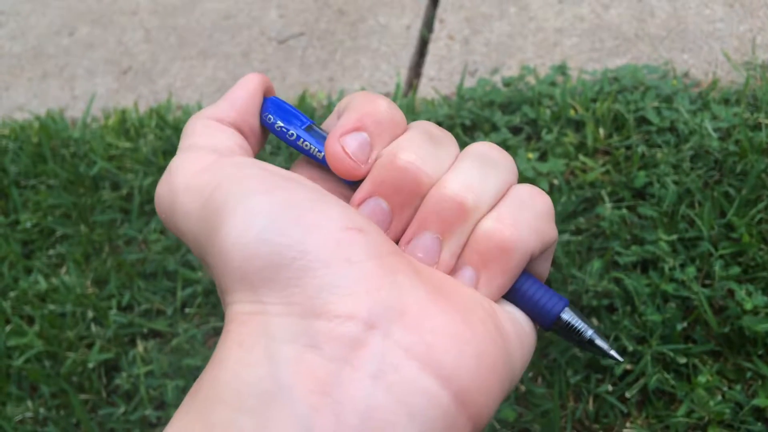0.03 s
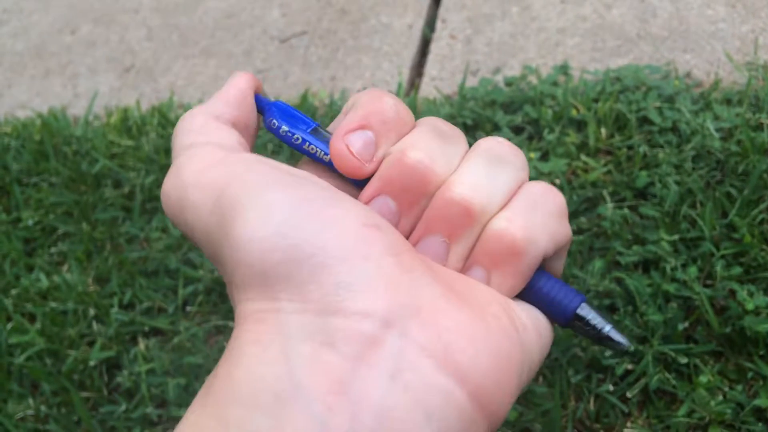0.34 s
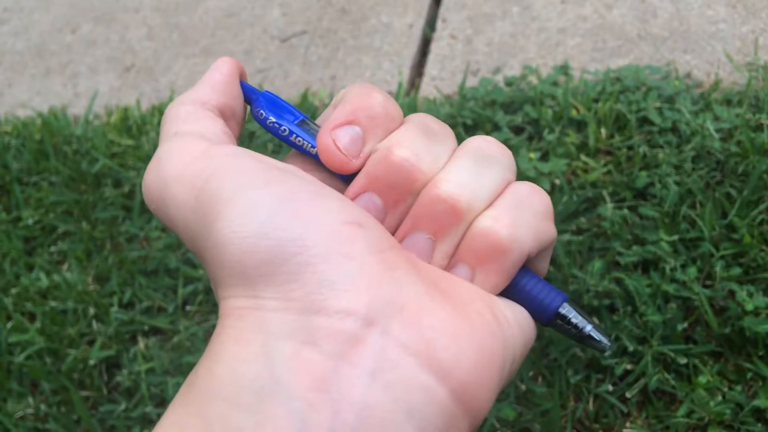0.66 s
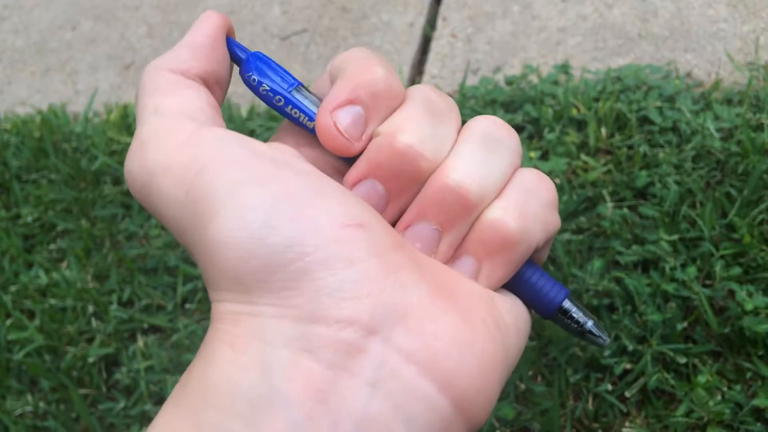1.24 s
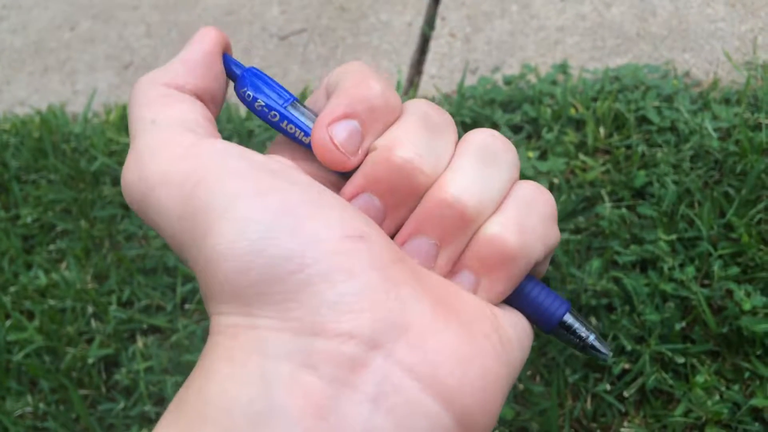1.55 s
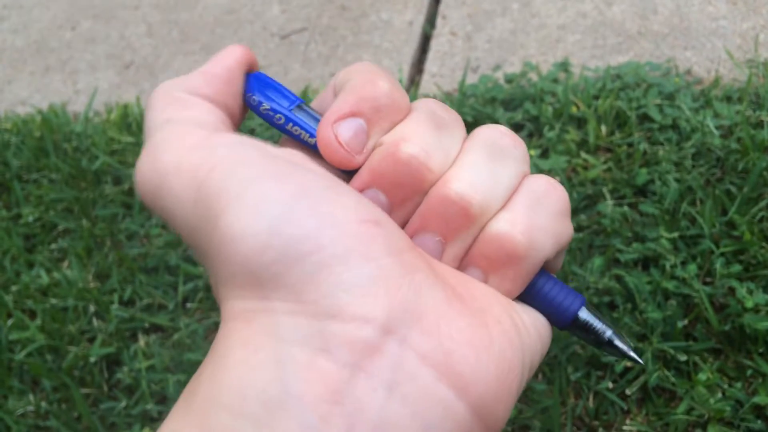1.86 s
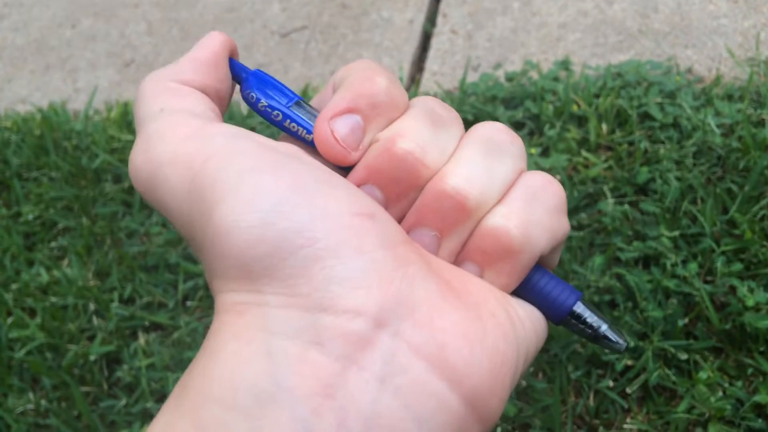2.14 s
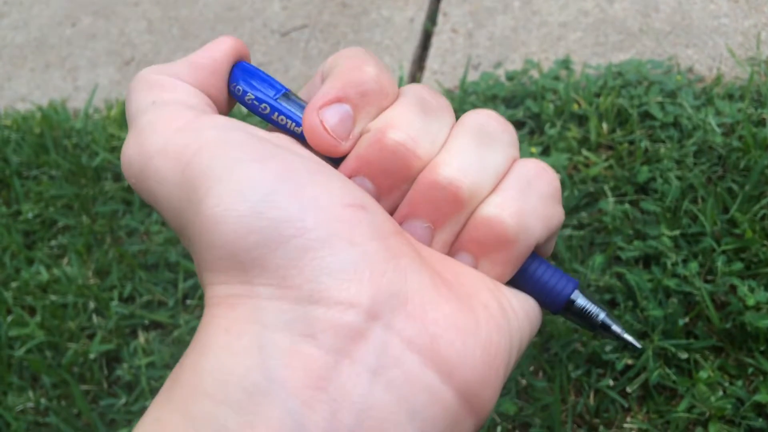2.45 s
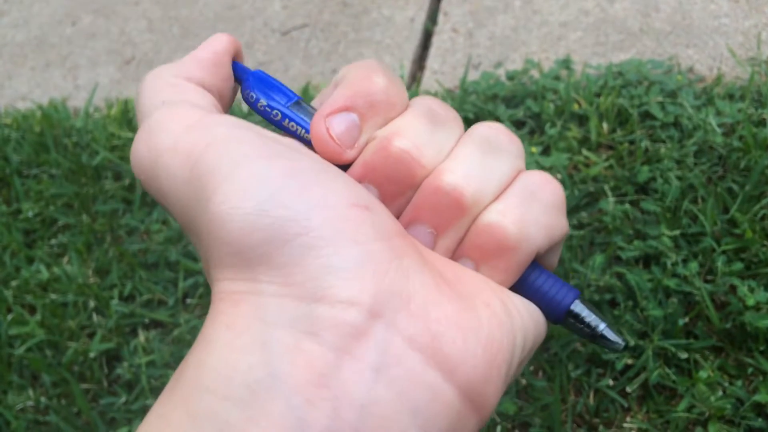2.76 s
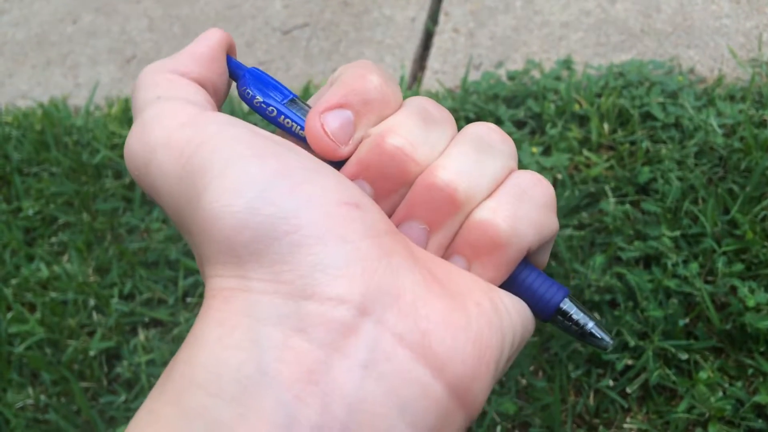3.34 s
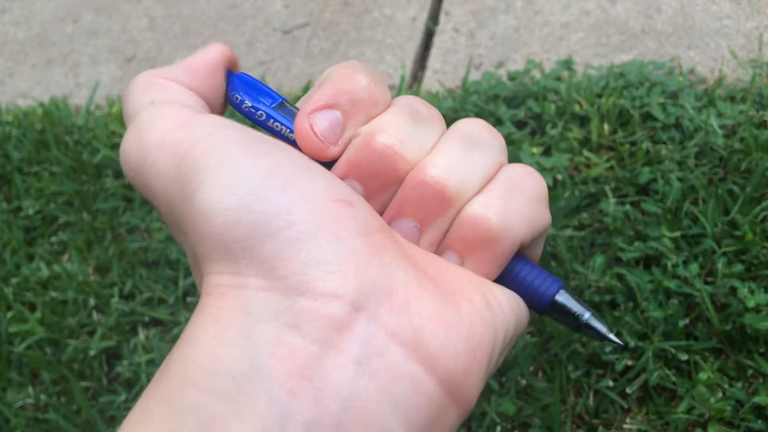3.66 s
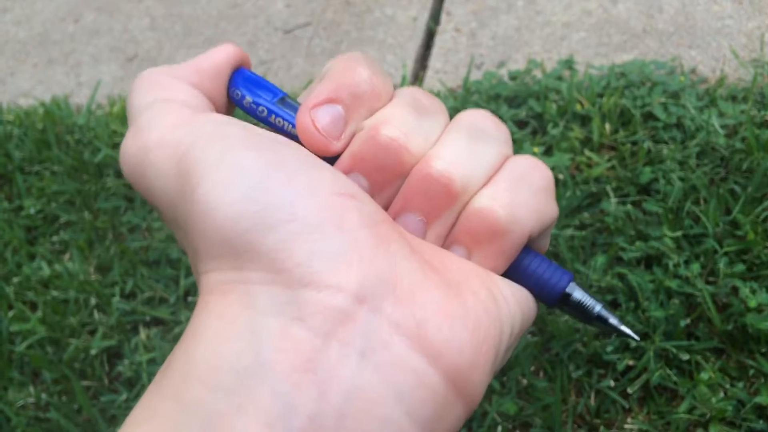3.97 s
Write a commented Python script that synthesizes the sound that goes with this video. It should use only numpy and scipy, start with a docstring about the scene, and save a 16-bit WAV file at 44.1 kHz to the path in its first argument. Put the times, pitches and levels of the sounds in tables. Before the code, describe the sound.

Close up on a lawn, a thumb clicks a retractable pen once, pauses, clicks it four times in quick succession, and once again after another pause. Insects buzz softly, far birds whistle, and distant traffic swells slightly near the end.

```python
"""A lawn: a thumb clicks a plastic retractable pen six times, close to the microphone.
Each press snaps the cam over with a light tick; each release lets the spring slam it home with a
sharp click and a faint sizzle. Both ring the barrel's modes and rattle the loose parts.
Behind it: low traffic rumble, a distant road that swells near the end, insects, far bird notes."""
import sys
import numpy as np
from scipy import signal
from scipy.fft import rfft, irfft, next_fast_len
from scipy.io import wavfile
from scipy.ndimage import map_coordinates

SR = 44100
rng = np.random.default_rng(int(sys.argv[2]) if len(sys.argv) > 2 else 0)


def int16_out(signal):
    """Quantize to a 16-bit WAV file."""
    q = np.round(np.clip(np.atleast_2d(signal).T, -1, 1) * 32767)
    wavfile.write(sys.argv[1], SR, q.astype(np.int16))


N = 176400

# barrel resonances: pitch_hz, gain_db, t60_s
BARREL_MODES = [(1994, -18, 0.0047), (3070, -7.5, 0.0031), (4670, -8, 0.0042), (5666, -1, 0.0028),
                (7940, -5, 0.002), (9700, -8.5, 0.0023), (11520, -4, 0.003), (14000, -12.5, 0.0031)]
# centres of the four snap bands: freq_hz
BANDS_HZ = [3100, 5800, 8200, 11700]
# cam snaps, coloured by grip and cam tooth:
# start_s, tuning_ratio, rebound_ms, rebound_ratio, band1_db, band2_db, band3_db, band4_db
PRESSES = [(.2847, 0.95, 0.8, 0.85, -14, -15.5, -7.5, -17.5), (1.803, 1.16, 1.137, 1, -8, -12, -3, -14.5),
           (2.0465, 0.94, 0.99, 0.43, -12.5, -7.5, -8.5, -11.5),
           (2.5235, .84, 0.94, 0.57, -15, -15, -10.5, -16.5),
           (2.748, 1.09, 0.293, .5, -11, -15, -10, -18.5),
           (3.8435, 1.13, .97, 0.39, -11.5, -19.5, -6.5, -13)]
RELEASES = [(0.4638, 1.02, 0.3, 0.23, -39, 2, -11, 1), (1.9324, 0.934, 0.236, 0.42, -4.5, 2, -4.5, 0.5),
            (2.1438, 0.98, 0.196, 0.16, -7, -11, 4.5, 0.5), (2.6403, 1.16, 0.34, 0.37, -1.5, -1.0, 1, -1.5),
            (2.864, 1.03, 0.17, 0.15, -5.0, 1, 1.5, -2), (3.9371, 1.064, 0.19, 0.56, 3.5, -5.0, 6.5, -5)]
# noise spectra: freq_hz, relative_db
CHATTER_SPECTRUM = [(500, -16), (1200, -5), (2200, -3), (5500, -4), (8000, 0.5), (12000, -19),
                    (16000, -3.5)]
GROUND_SPECTRUM = [(1000, 1), (4000, 4), (16000, -11)]
SPRING_SPECTRUM = [(1500, -14), (4000, -6), (6000, 2), (9000, -2), (12500, -3), (16000, -13)]
RUMBLE_SPECTRUM = [(20, -38), (40, -13), (58, -4), (90, -3.5), (125, -5), (160, -1), (190, 1.5),
                   (235, -6.5), (290, -16), (400, -30), (800, -65)]
TYRE_SPECTRUM = [(30, -15), (200, 4.5), (350, -3), (520, -9), (700, -2), (900, 3), (1300, -0.5), (1900, -5),
                 (2600, -13), (5000, -5), (10000, -36), (12000, -37), (16000, -41)]
SWELL_SPECTRUM = [(30, -20), (150, -7), (300, 5), (550, 1), (1000, -0.5), (2000, -11), (4000, -13.5),
                  (8000, -22.5), (12000, -29.5), (16000, -34)]
INSECT_SPECTRUM = [(1800, -45), (2800, -12), (3500, -3.5), (4200, -2), (4900, 2.5), (5500, -0.5),
                   (6500, -7), (8200, -19.5), (10400, -23.5), (11500, -30.5), (16000, -58)]
# background envelopes: time_s, level_db
RUMBLE_LEVEL = [(0, -40.5), (0.299, -42), (.9, -42), (1.25, -41), (1.4, -40.5), (1.67, -39.5), (1.78, -34),
                (1.86, -40.5), (2.3, -39), (2.7, -42), (3.1, -40.5), (3.3, -42.5), (3.5, -38.5),
                (3.75, -37), (4, -36.5)]
TYRE_LEVEL = [(0, -48), (.4, -47.5), (.8, -48.5), (1.3, -49.5), (2, -47.5), (2.6, -48), (4, -47.5)]
SWELL_LEVEL = [(0, -70), (1.2, -75.5), (1.8, -55), (2.4, -58.5), (3.1, -51), (3.55, -44.5), (4, -47)]
INSECT_LEVEL = [(0, -47.5), (.35, -47), (.8, -48), (1.3, -47), (1.6, -49), (2.1, -47), (2.8, -46.5),
                (3.05, -49), (3.6, -47.5), (4, -48)]
# one insect winding down: time_s, pitch_hz, level_db
FALLING_BUZZ = [(1.2, 5310, -73), (1.36, 5000, -51), (1.46, 4470, -47), (1.55, 4130, -51.5),
                (1.64, 3720, -52), (1.76, 3600, -72)]
# far whistles: peak_s, half_length_s, pitch_hz, level_db
BIRD_NOTES = [(.43, .09, 4250, -54.5), (.45, .09, 2980, -61), (.67, .06, 3980, -55), (.76, .08, 3010, -62),
              (1.48, .06, 4250, -50.5), (1.5, .05, 3500, -56), (1.54, .07, 3900, -50),
              (1.88, .12, 3870, -55), (2.31, .05, 3980, -55.5), (2.6, .08, 3510, -56),
              (2.65, .06, 3870, -53.5), (2.83, .06, 3890, -54), (3.62, .07, 4230, -57.5),
              (3.67, .07, 3500, -60)]


def pen(echo_s=0.0032, echo_db=-19.5, ground_db=-22.5, ground_t60_s=0.1):
    """Presses and releases, with a reflection off the hand and a short tail off the ground."""
    clicks = cam_snaps(PRESSES, chatter_db=-15, rise_s=0.00075, t60_s=0.019)
    clicks += cam_snaps(RELEASES, chatter_db=-15.5, rise_s=0.0009, t60_s=0.0092)
    t = np.arange(SR // 4) / SR
    ground = noise(GROUND_SPECTRUM, len(t)) * decay(t, ground_t60_s)
    tail = signal.fftconvolve(clicks, ground / np.linalg.norm(ground))[:N]
    echo = np.pad(clicks, (round(echo_s * SR), 0))[:N]
    return clicks + amp(echo_db) * echo + amp(ground_db) * tail


def cam_snaps(rows, chatter_db, rise_s, t60_s):
    """The cam scrapes to its edge, strikes and rebounds; the refill chatters briefly."""
    track = np.zeros(N + SR)
    size, lead = 2048, 512
    t = (np.arange(size) - lead) / SR
    envelope = np.exp(np.minimum(t, 0) / rise_s) * decay(np.maximum(t, 0), t60_s)
    for start_s, tuning, rebound_ms, rebound_ratio, *band_db in rows:
        strike = barrel_ring(t, tuning, band_db)
        rebound = barrel_ring(t - rebound_ms / 1000, tuning, band_db)
        snap = strike + rebound_ratio * rebound
        strength = np.sqrt(np.sum(snap ** 2) / (SR / 1000))  # rms if packed into 1 ms
        chatter = strength * amp(chatter_db) * envelope * noise(CHATTER_SPECTRUM, size)
        track[round(start_s * SR) - lead:][:size] += snap + chatter
    return track[:N]


def barrel_ring(t, tuning, band_db, attack_s=0.00014):
    """One cam contact rings the barrel; the hand damps it within milliseconds."""
    hz, gain_db, t60_s = np.transpose(BARREL_MODES)
    t = np.maximum(t, 0)
    signs = (-1) ** np.arange(len(hz))
    gains = signs * amp(gain_db + np.interp(hz, BANDS_HZ, band_db))
    modes = np.sin(2 * np.pi * tuning * hz[:, None] * t) * decay(t, t60_s[:, None])
    return gains @ modes * (1 - np.exp(-t / attack_s))


def spring(level_db=-46.5, t60_s=0.17):
    """The coil shivers after each release throws the refill back."""
    t = np.arange(N) / SR
    shiver = sum((t > start_s) * decay(np.abs(t - start_s), t60_s) for start_s, *_ in RELEASES)
    return amp(level_db) * shiver * noise(SPRING_SPECTRUM, N)


def traffic():
    """Engine rumble, far tyre noise and a broad rush that draws nearer."""
    rumble = wash(RUMBLE_SPECTRUM, RUMBLE_LEVEL)
    tyres = wash(TYRE_SPECTRUM, TYRE_LEVEL)
    swell = wash(SWELL_SPECTRUM, SWELL_LEVEL)
    return rumble + tyres + swell


def insects():
    """A sizzling chorus; one buzz sinks in pitch as it winds down."""
    chorus = wash(INSECT_SPECTRUM, INSECT_LEVEL)
    pitch_hz, level_db = curves(FALLING_BUZZ)
    return chorus + amp(level_db) * fuzzy_tone(pitch_hz, width_hz=1100)


def birds():
    """Thin, smeared whistles that fade in and out."""
    t = np.arange(N) / SR
    notes = np.zeros(N)
    for peak_s, half_length_s, pitch_hz, level_db in BIRD_NOTES:
        envelope = np.exp(-((t - peak_s) / half_length_s) ** 2)
        notes += amp(level_db) * envelope * fuzzy_tone(pitch_hz, width_hz=75)
    return notes


def wash(spectrum, envelope):
    """Coloured noise following a level curve."""
    level_db, = curves(envelope)
    return amp(level_db) * noise(spectrum, N)


def noise(spectrum, size):
    """Noise at rms 1, its spectrum interpolated over log frequency."""
    knot_hz, knot_db = np.transpose(spectrum)
    hz = np.fft.rfftfreq(size, 1 / SR)
    gain = amp(np.interp(np.log(hz + 1), np.log(knot_hz + 1), knot_db))
    return unit_rms(irfft(rfft(rng.standard_normal(size)) * gain, size))


def fuzzy_tone(pitch_hz, width_hz):
    """Narrow noise band around a pitch track, rms 1."""
    phase = 2 * np.pi * np.cumsum(pitch_hz * np.ones(N)) / SR
    return unit_rms(wobble(width_hz) * np.sin(phase) + wobble(width_hz) * np.cos(phase))


def wobble(rate_hz):
    """Smooth curve through random knots."""
    knots = rng.standard_normal(N // 8)[:int(N * rate_hz / SR) + 4]
    return map_coordinates(knots, [np.arange(N) * rate_hz / SR], mode="nearest")


def curves(rows):
    """Per-sample values of each column after time_s."""
    time_s, *columns = np.transpose(rows)
    return [np.interp(np.arange(N) / SR, time_s, column) for column in columns]


def decay(t, t60_s):
    """Falls 60 dB in t60_s."""
    return np.exp(-np.log(1000) * t / t60_s)


def amp(db):
    """Decibels to gain."""
    return 10 ** (np.asarray(db) / 20)


def unit_rms(x):
    """x at rms 1."""
    return x / np.sqrt(np.mean(x ** 2) + 1e-20)


def scene():
    """All sources at one microphone, the same in both channels."""
    mono = pen() + spring() + traffic() + insects() + birds()
    return np.array([mono, mono])


def record(dry):
    """The microphone rounds the sharpest peaks and cuts the top treble."""
    cutoff_hz = 16400
    rounded = dry / (1 + np.abs(dry) ** 6) ** (1 / 6)
    size = next_fast_len(N + SR // 2)
    hz = np.fft.rfftfreq(size, 1 / SR)
    low_pass = 1 / (1 + (hz / cutoff_hz) ** 70) ** 2
    return irfft(rfft(rounded, size) * low_pass, size)[:, :N]


dry = scene()
out = record(dry)
int16_out(out)
```